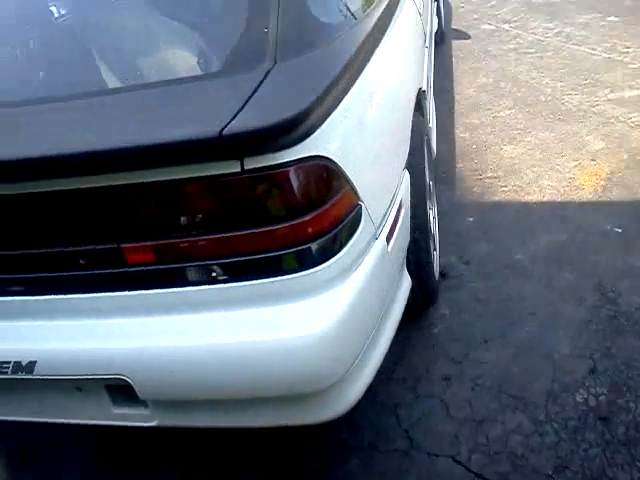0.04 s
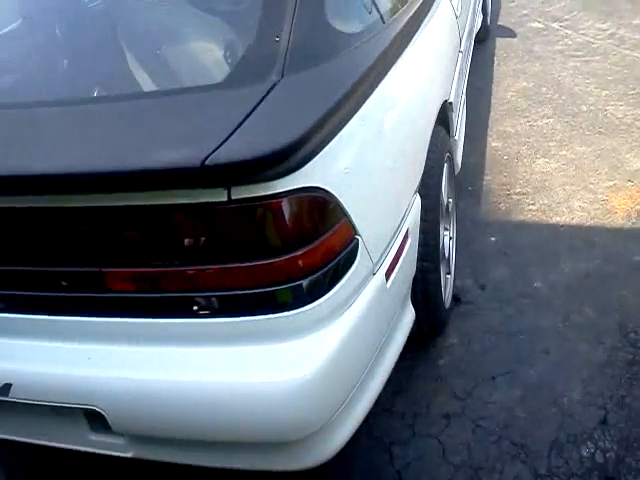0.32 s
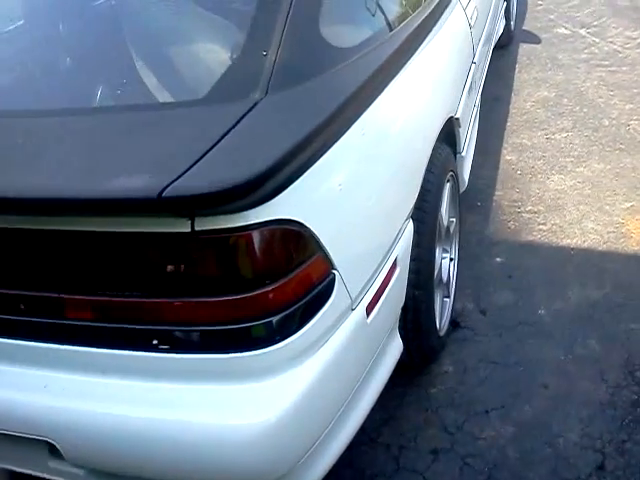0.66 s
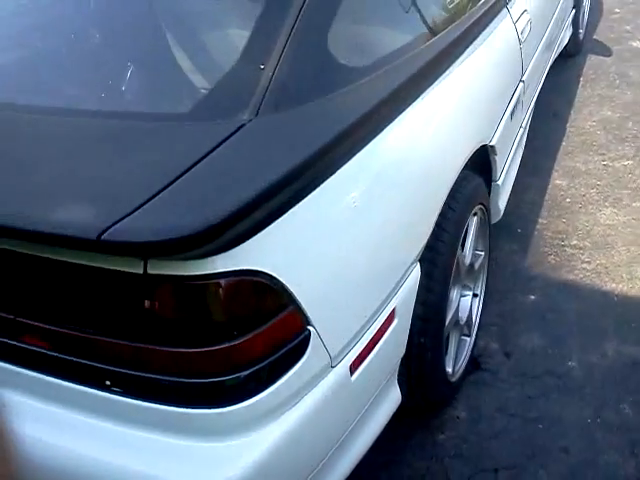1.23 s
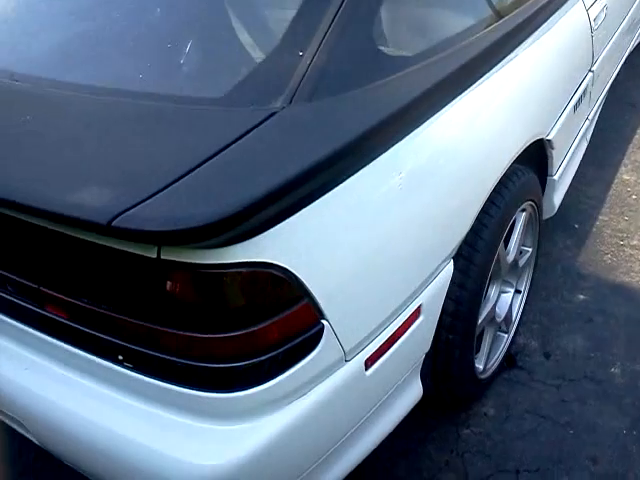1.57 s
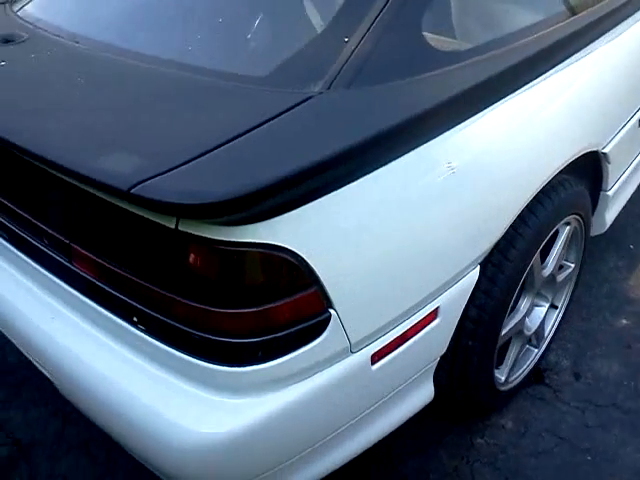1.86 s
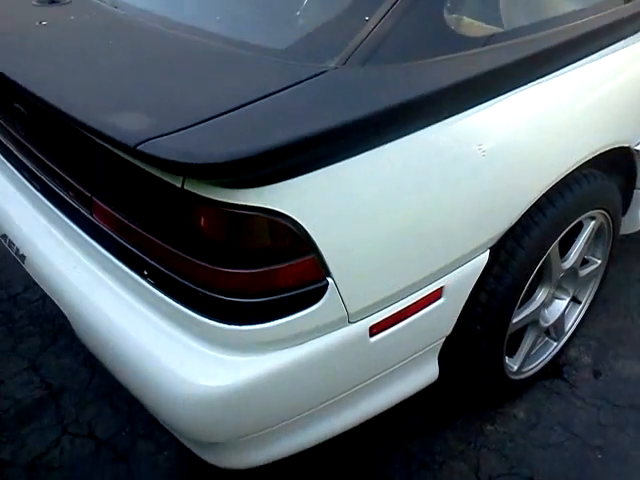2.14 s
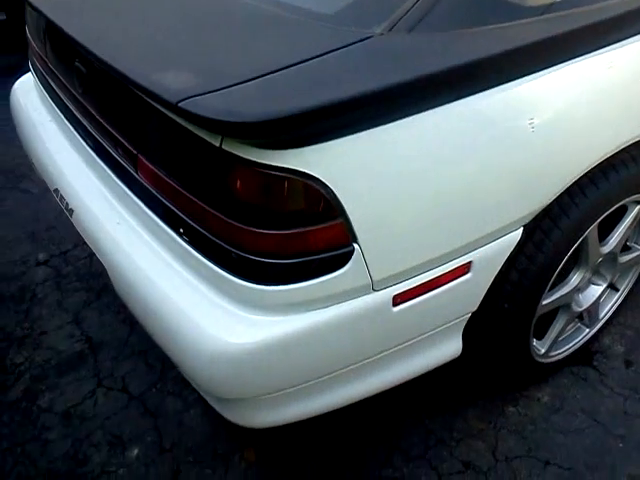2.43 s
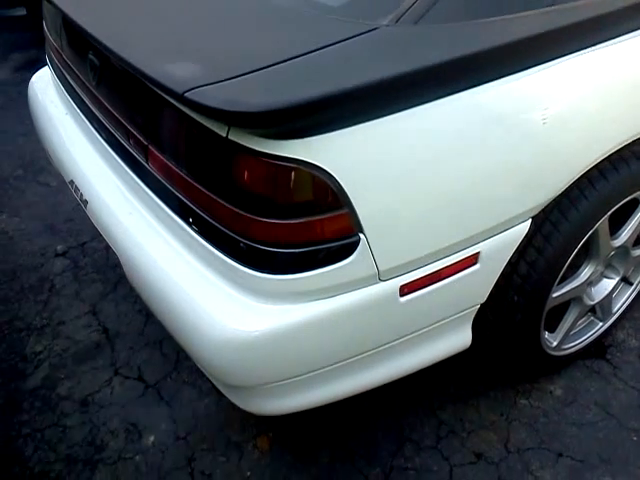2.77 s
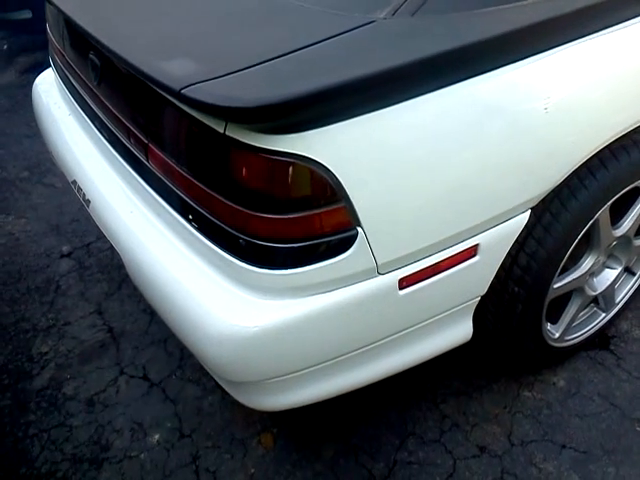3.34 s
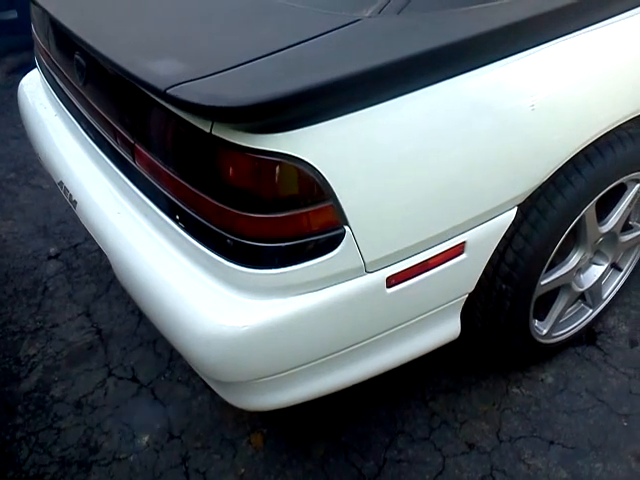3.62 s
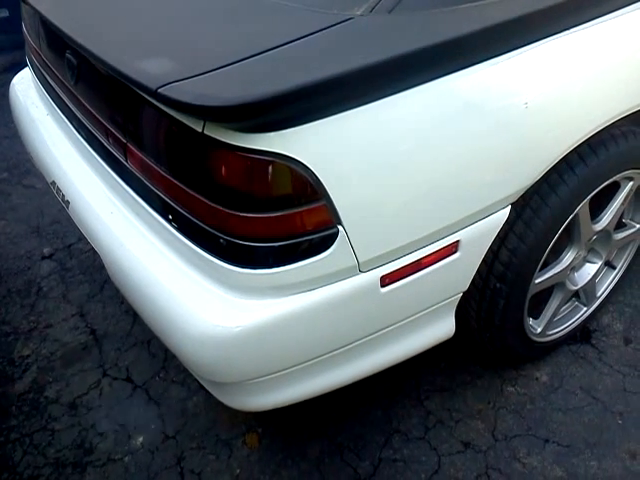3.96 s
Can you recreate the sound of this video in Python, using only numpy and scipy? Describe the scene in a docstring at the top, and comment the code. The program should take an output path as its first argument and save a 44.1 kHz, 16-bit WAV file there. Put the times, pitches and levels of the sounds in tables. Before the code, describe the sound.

A parked car idles roughly outdoors, heard on a handheld phone a step from the tailpipe. Raspy, booming exhaust pops come in uneven groups over a steady low churn, and a brief metallic rattle ticks once midway.

```python
"""Behind a parked car's tailpipe, a step away, on a handheld phone: a rough idle.
Most firings are feeble; the strong ones come in lumpy groups of one to four pops.
Each pop is a rasp of gas, a short shrill ring of the pipe and a boom of the muffler.
A brief rattle ticks once. The surroundings throw it all back, over a steady engine churn."""
import sys
import numpy as np
from scipy import signal
from scipy.fft import rfft, irfft
from scipy.io import wavfile
from scipy.ndimage import uniform_filter1d

SR = 44100
rng = np.random.default_rng(int(sys.argv[2]) if len(sys.argv) > 2 else 0)


def store_pcm(level_fs):
    """Save levels as 16-bit WAV."""
    pcm = np.round(np.clip(level_fs, -1, 1) * 32767).astype(np.int16)
    wavfile.write(sys.argv[1], SR, np.atleast_2d(pcm).T)


N = 176400

# Exhaust gas spectrum: freq_hz, level_db
RASP_SPECTRUM = [(100, -21), (400, -1), (700, -5), (1000, -3.5), (1400, -0.5), (1800, 3), (2450, 2.5),
                 (2900, -4), (3500, -16), (4400, -45.5)]
GAS_LINGER_S = 0.023
BOOM_HZ, BOOM_LAG_S, BOOM_RISE_S, BOOM_FALL_S = 263, 0.0044, 0.0035, 0.0091


def amp(db):
    """Decibels to gain."""
    return 10 ** (np.asarray(db) / 20)


def unit_rms(x):
    """Scale to rms 1."""
    return x / np.sqrt(np.mean(x ** 2) + 1e-20)


def lookup(table, hz):
    """Interpolate over log frequency."""
    freq_hz, value = np.transpose(table)
    return np.interp(np.log(hz + 1), np.log(freq_hz + 1), value)


def coloured(noise, spectrum):
    """Noise shaped to a spectrum, rms 1."""
    gain = amp(lookup(spectrum, np.fft.rfftfreq(len(noise), 1 / SR)))
    return unit_rms(irfft(rfft(noise) * gain, len(noise)))


def add(mix, centre_s, sound):
    """Mix in a sound centred on centre_s."""
    start = round(centre_s * SR) - len(sound) // 2
    part = mix[max(start, 0):max(start + len(sound), 0)]
    part += sound[max(-start, 0):][:len(part)]


def event_time():
    """Seconds around one event, zero in the middle."""
    return np.arange(-5000, 5000) / SR


def swell(t, rise_s, fall_s):
    """Gaussian rise to 1 at t = 0, then exponential decay."""
    return np.exp(-(np.minimum(t, 0) / rise_s) ** 2 - np.maximum(t, 0) / fall_s)


def damped_tone(t, hz, rise_s, fall_s):
    """A resonance swelling and dying away."""
    return swell(t, rise_s, fall_s) * np.cos(2 * np.pi * hz * t)


def pops():
    """Strong firings: gas rasp and sizzle, pipe ring, low push, a muffler boom and its pipe return."""
    # Firings, levels before trim:
    # peak_s, rise_s, rasp_db, sizzle_db, ring_db, ring_hz, boom_db, return_db, boom_hz
    firings = [(0.195, 0.0056, -16, -21.5, -14.5, 2455, -24.5, -20.5, 273),
               (0.286, 0.006, -14, -20.5, -11, 1820, -18.2, -21.5, 283),
               (0.424, 0.0066, -15, -26.3, -13.5, 1615, -22, -15.5, 254),
               (0.514, 0.0043, -13.5, -27, -13.5, 1787, -21, -20.5, 257),
               (0.649, 0.0046, -15, -20.5, -15, 1978, -24.5, -22, 295),
               (0.741, 0.0024, -15.5, -25.5, -7.5, 1846, -21, -35.5, 282),
               (0.986, 0.0032, -13.5, -21, -9.5, 2480, -29, -14.5, 262),
               (1.035, 0.0036, -14.5, -22.0, -28, 2320, -17.5, -24, 290),
               (1.083, 0.0041, -14.5, -23.5, -13.5, 1658, -15.5, -20.5, 264),
               (1.24, 0.0041, -21.5, -31, -17, 2415, -24, -19, 271),
               (1.348, 0.0049, -17, -30.5, -14, 2396, -27, -17.5, 276),
               (1.574, 0.0048, -28, -40, -24, 2422, -35, -23.5, 249),
               (1.63, 0.0037, -14, -30, -7.5, 2620, -25, -14, 251),
               (1.68, 0.0066, -12.5, -23.8, -13, 2153, -21, -30, 295),
               (1.723, 0.0031, -11.5, -31, -8.5, 1776, -15, -23.5, 270),
               (1.877, 0.0057, -25.5, -31, -27.5, 2435, -26.5, -20.5, 264),
               (1.933, 0.0061, -21, -36, -18.5, 2470, -21.9, -29.5, 257),
               (1.978, 0.0028, -13.5, -33.1, -8, 1865, -17.4, -32, 275),
               (2.02, 0.0048, -14.5, -24.5, -15.5, 2267, -20, -17.5, 268),
               (2.208, 0.006, -16, -30, -37.5, 2430, -20.5, -15.5, 251),
               (2.251, 0.0049, -16.5, -28.5, -15, 1787, -17, -23.5, 271.6),
               (2.29, 0.0035, -11.5, -26, -7, 1792, -20, -10.5, 256.6),
               (2.499, 0.005, -17, -30, -20, 1873, -21.5, -26.1, 274),
               (2.54, 0.0036, -13, -28, -11.5, 1938, -17, -18, 266),
               (2.578, 0.004, -17, -28.0, -10.5, 1859, -19, -29, 260),
               (2.789, 0.0073, -18.5, -26.5, -21, 1808, -19.5, -14.5, 263),
               (2.826, 0.0025, -14, -34.5, -7.5, 1830, -19.5, -18.5, 271),
               (2.865, 0.007, -19, -34, -18.5, 1755, -22.5, -23.5, 264),
               (3.043, 0.0063, -18.5, -33, -25, 1723, -17.5, -17.5, 259),
               (3.085, 0.0037, -13, -24.8, -9.5, 1755, -16.5, -34, 275.6),
               (3.324, 0.0071, -19, -23, -21.5, 2627, -24.1, -18.5, 250),
               (3.368, 0.006, -14, -19.5, -30, 1900, -16.5, -24, 273),
               (3.623, 0.003, -14.5, -33.5, -16, 2414, -30, -16.5, 260),
               (3.671, 0.0049, -16.5, -27, -13.5, 1794, -18.5, -25, 271),
               (3.953, 0.0064, -20, -24.5, -17.5, 2474, -27.5, -22, 249),
               (3.996, 0.0035, -18.5, -23, -25.5, 2860, -21.5, -28, 268)]
    # Spectra of the high gas sizzle and the low push: freq_hz, level_db
    sizzle_spectrum = [(100, -60.5), (2200, -29), (2800, -3), (3200, 7.5), (3450, -4.5), (3750, -17.5),
                       (4400, -33.5)]
    push_spectrum = [(20, -38), (45, -14.5), (85, 0), (130, -7), (200, 9), (350, 6.5), (550, -9),
                     (1000, -27), (3000, -49)]
    gas_trim_db, push_trim_db, ring_trim_db, boom_trim_db, return_trim_db = -2, -4, 2.5, 5, 0.5
    hold_s, return_lag_s = 0.0006, 0.02
    t = event_time()
    held_t = np.minimum(t, 0) + np.maximum(t - hold_s, 0)  # gas holds briefly at full flow
    rasp, sizzle, push, tones = np.zeros((4, N))
    for peak_s, rise_s, rasp_db, sizzle_db, ring_db, ring_hz, boom_db, return_db, boom_hz in firings:
        burst = swell(held_t, rise_s, fall_s=0.0093) + amp(-15.5) * swell(t, rise_s, GAS_LINGER_S)
        burst *= 1 + 0.39 * np.cos(2 * np.pi * boom_hz * t)  # gas puffs at the muffler's pitch
        add(rasp, peak_s, amp(rasp_db + gas_trim_db) * burst)
        add(sizzle, peak_s, amp(sizzle_db + gas_trim_db) * burst)
        surge = swell(t - BOOM_LAG_S, rise_s=0.007, fall_s=0.022)
        add(push, peak_s, amp(boom_db + push_trim_db) * surge)
        add(tones, peak_s, amp(ring_db + ring_trim_db) * pipe_ring(t, ring_hz, 0.82 * rise_s))
        boom = damped_tone(t - BOOM_LAG_S, boom_hz, BOOM_RISE_S, BOOM_FALL_S)
        add(tones, peak_s, amp(boom_db + boom_trim_db) * boom)
        returned = damped_tone(t - return_lag_s, hz=263.5, rise_s=0.0052, fall_s=0.011)
        add(tones, peak_s, amp(return_db + return_trim_db) * returned)
    gas = rasp * gas_jet(RASP_SPECTRUM) + sizzle * gas_jet(sizzle_spectrum)
    return gas + push * coloured(rng.standard_normal(N), push_spectrum) + tones


def gas_jet(spectrum):
    """Grainy noise of gas tearing out of the pipe, peaks rounded."""
    crackle_db, crest = 4, 2.57
    grain = unit_rms(uniform_filter1d(rng.standard_normal(N), size=30))
    crackle = amp(crackle_db * np.clip(grain, -2, 2))
    jet = coloured(rng.standard_normal(N) * crackle, spectrum)
    return unit_rms(jet / np.sqrt(1 + abs(signal.hilbert(jet) / crest) ** 2))


def pipe_ring(t, hz, rise_s):
    """Short shrill pipe resonance with a wobbling pitch."""
    wobble = unit_rms(uniform_filter1d(rng.standard_normal(len(t)), size=70))
    phase = 2 * np.pi * np.cumsum(hz * (1 + 0.025 * wobble)) / SR
    return swell(t, rise_s, fall_s=0.0037) * np.sin(phase)


def weak_firings():
    """Feeble, near-regular beats and a few firmer thuds: a soft boom and a puff each."""
    # Soft thuds with a puff of gas; the first is a pop dying away: time_s, boom_db, puff_db
    thuds = [(0.005, -21.5, -29), (0.056, -25.5, -41), (0.377, -27.5, -48), (0.56, -19, -33.5),
             (.825, -27, -48), (2.161, -19.5, -37), (2.381, -21, -34), (2.701, -16.5, -36)]
    firings_per_s = 14
    t = event_time()
    puff = swell(t, rise_s=0.0072, fall_s=GAS_LINGER_S)
    puffs, booms = np.zeros((2, N))
    for beat, (jitter, drop_db, detune) in enumerate(rng.standard_normal((100, 3))):
        time_s = (beat + 0.084 * jitter) / firings_per_s
        boom = damped_tone(t, BOOM_HZ * (1 + 0.18 * detune), rise_s=0.0052, fall_s=BOOM_FALL_S)
        add(booms, time_s, amp(-34 - drop_db) * boom)
        add(puffs, time_s, amp(-42.5 - drop_db) * puff)
    thud = damped_tone(t - BOOM_LAG_S, BOOM_HZ, BOOM_RISE_S, BOOM_FALL_S)
    for time_s, boom_db, puff_db in thuds:
        add(booms, time_s, amp(boom_db) * thud)
        add(puffs, time_s, amp(puff_db) * puff)
    return booms + puffs * gas_jet(RASP_SPECTRUM)


def rattle():
    """A brief run of small metallic ticks."""
    # Ticks: peak_s, level_db
    ticks = [(2.142, -21.5), (2.148, -17), (2.156, -25.5), (2.182, -9), (2.19, -25)]
    tick = damped_tone(event_time(), hz=2370, rise_s=0.00062, fall_s=0.00062)
    out = np.zeros(N)
    for peak_s, level_db in ticks:
        add(out, peak_s, amp(level_db) * tick)
    return out


def reflections(direct):
    """Echoes off ground, car and walls: sparse taps, each band dying at its own rate."""
    # Reverberation time: freq_hz, t60_s
    decay_times = [(80, .35), (260, 0.32), (700, 0.39), (2000, 0.4), (4000, 0.38)]
    # Reverberation gain: freq_hz, level_db
    echo_spectrum = [(60, -7.5), (260, -11.5), (450, -1), (1000, -4.5), (1800, -13.5), (2600, -9.5),
                     (4000, -9.5)]
    taps_per_s, delay_s = 2000, 0.012
    out, time_s = np.zeros(N), np.arange(N) / SR
    for k in range(3):
        taps = rng.choice([-1., 1.], SR) * (rng.random(SR) < taps_per_s / SR)
        taps *= np.arange(SR) > delay_s * SR
        hz, age_s, bands = signal.stft(taps, SR, nperseg=512)
        bands *= amp(-60 * age_s / lookup(decay_times, hz)[:, None])
        norm = np.linalg.norm(signal.istft(bands, SR, nperseg=512)[1])
        bands *= amp(lookup(echo_spectrum, hz))[:, None]
        tail = signal.istft(bands, SR, nperseg=512)[1] / norm
        crossfade = np.sqrt(2 / 3) * np.cos(2 * np.pi * (time_s + k / 3))  # 1 Hz, constant total power
        out += signal.fftconvolve(direct * crossfade, tail)[:N]
    return out


def engine_churn():
    """Steady low noise of the engine."""
    # Churn spectrum: freq_hz, level_db
    churn_spectrum = [(20, -29), (60, -5.5), (130, -1), (205, 10), (300, 15), (450, 3), (800, 0),
                      (1400, -3.5), (2400, -3.5), (3200, -3.5), (4400, -48)]
    return amp(-38.5) * coloured(rng.standard_normal(N), churn_spectrum)


def scene():
    """Exhaust and rattle with their reflections, over the churn; mono."""
    direct = pops() + weak_firings() + rattle()
    return (direct + reflections(direct) + engine_churn())[None]


def record(dry):
    """Narrow-band phone microphone: a fast limiter rounds the hardest pops, overshoot clips."""
    limit_level, clip_level, mic_edge_hz, top_hz = 0.89, 0.72, 4269, 16000
    drive = abs(signal.hilbert(dry[0])) / limit_level
    limited = dry / (1 + drive ** 10) ** (1 / 10)
    mic_lowpass = signal.firwin(161, mic_edge_hz, window=("kaiser", 8), fs=SR)
    narrow = signal.oaconvolve(limited, mic_lowpass[None], "same")
    clipped = np.clip(narrow, -clip_level, clip_level)
    top_lowpass = signal.firwin(255, top_hz, window=("kaiser", 9), fs=SR)
    return signal.oaconvolve(clipped, top_lowpass[None], "same")


dry = scene()
out = record(dry)
store_pcm(out)
```